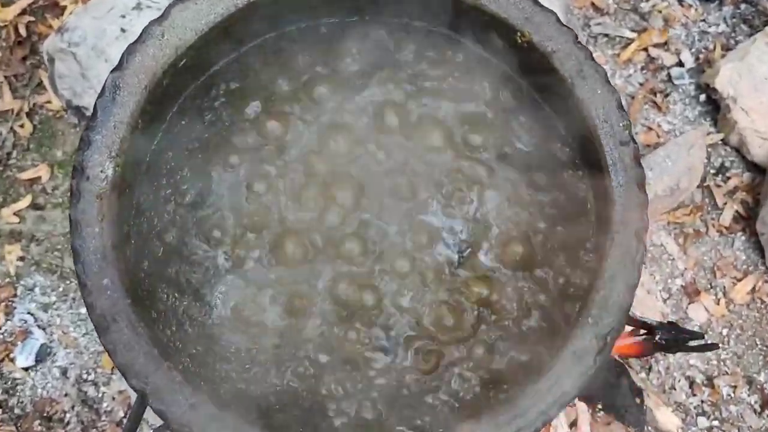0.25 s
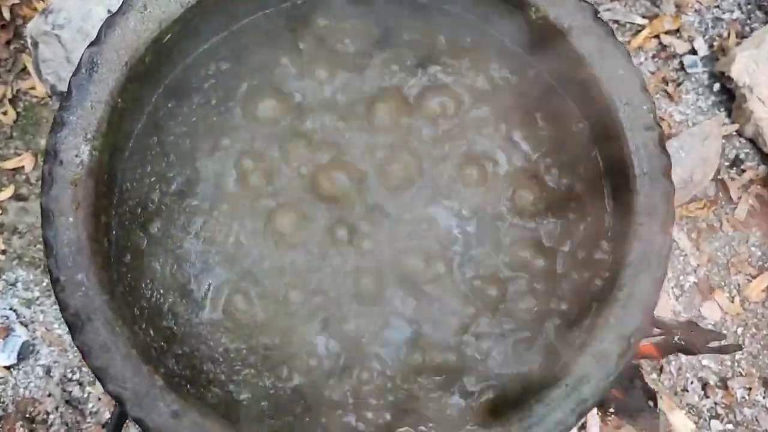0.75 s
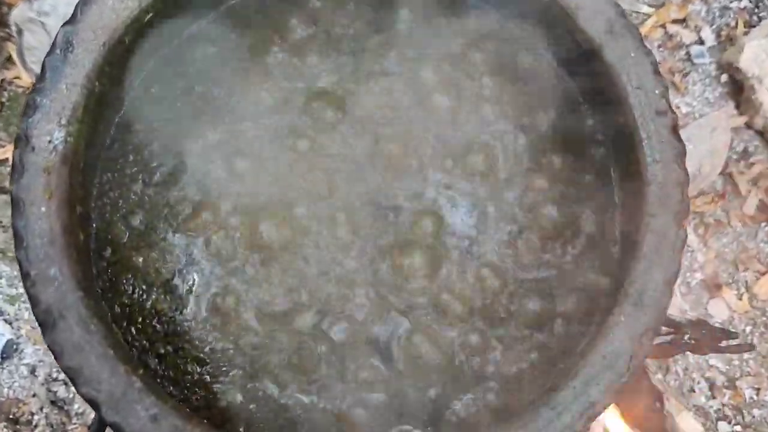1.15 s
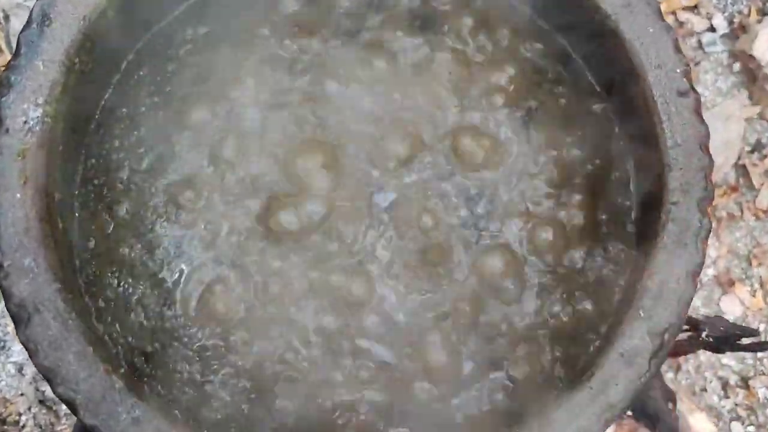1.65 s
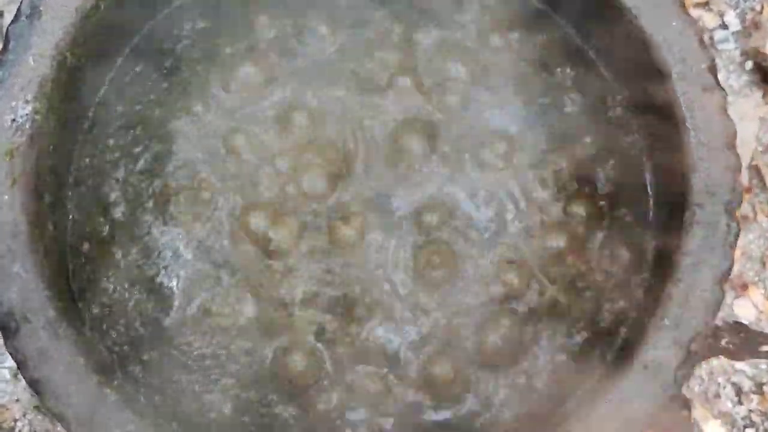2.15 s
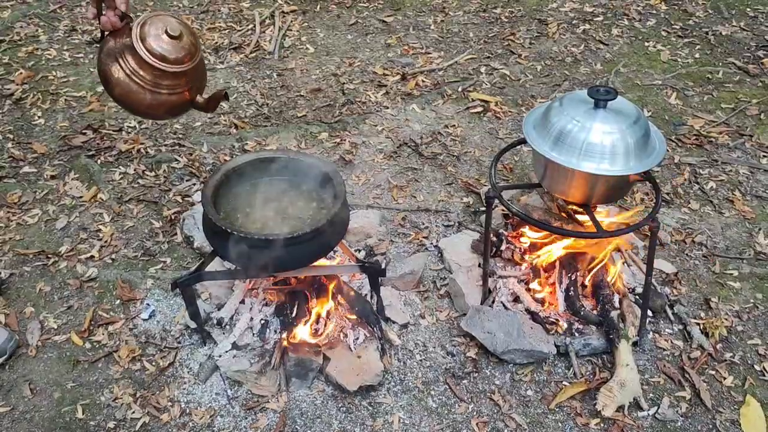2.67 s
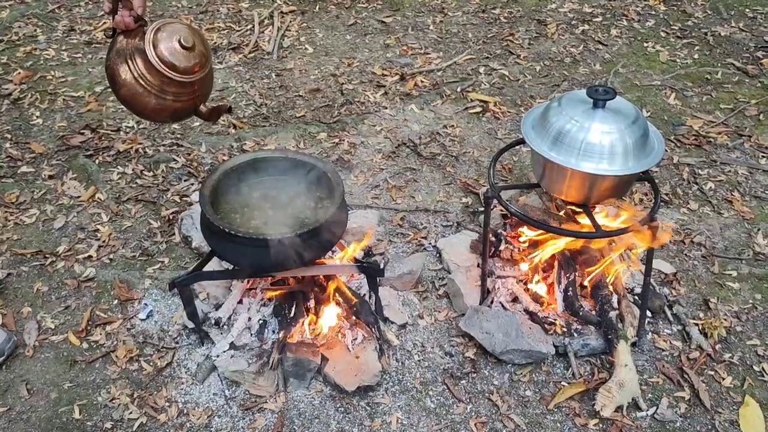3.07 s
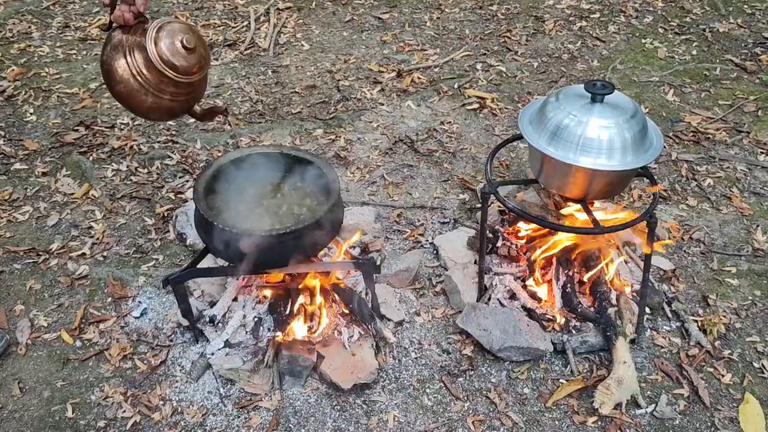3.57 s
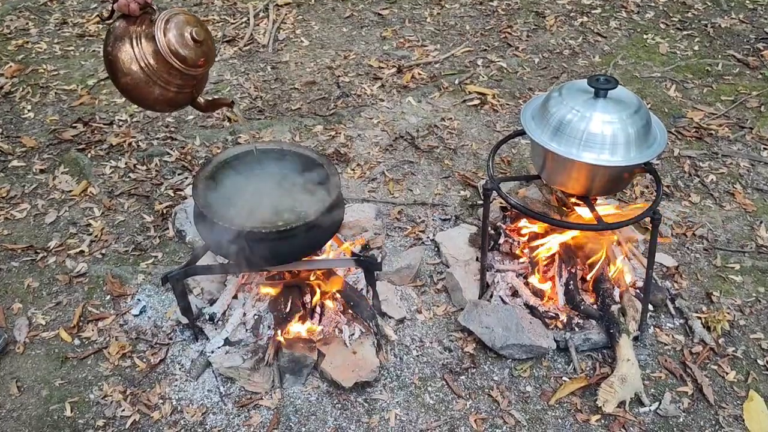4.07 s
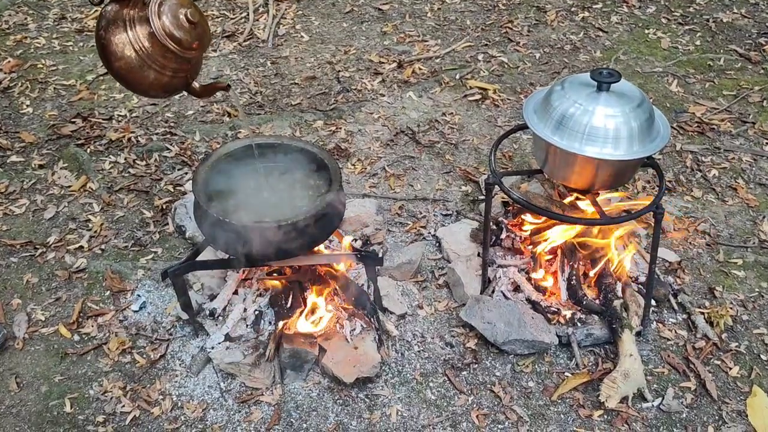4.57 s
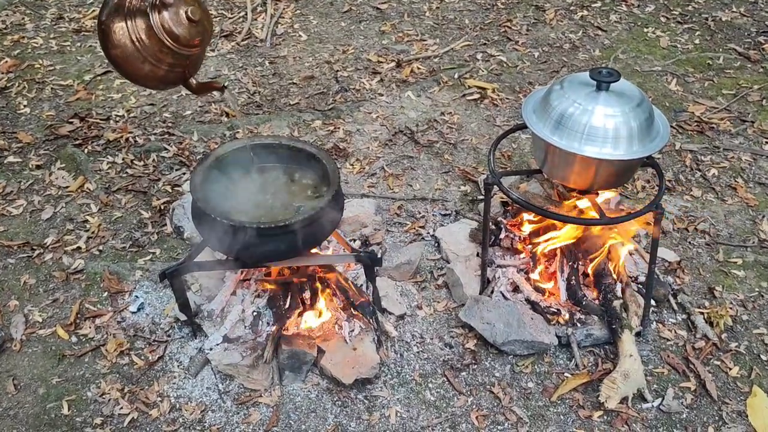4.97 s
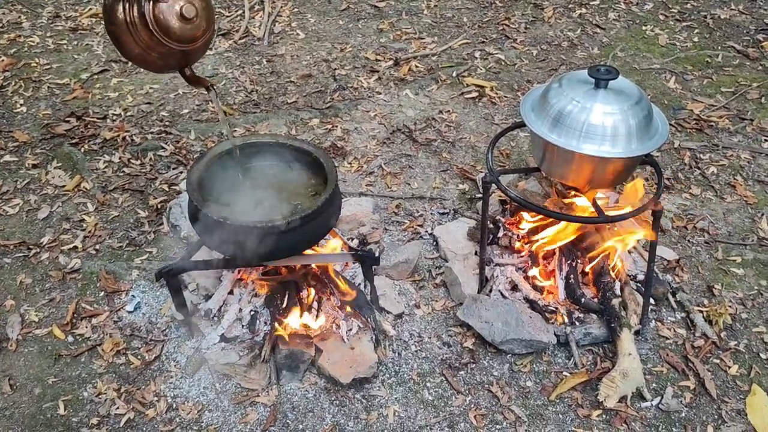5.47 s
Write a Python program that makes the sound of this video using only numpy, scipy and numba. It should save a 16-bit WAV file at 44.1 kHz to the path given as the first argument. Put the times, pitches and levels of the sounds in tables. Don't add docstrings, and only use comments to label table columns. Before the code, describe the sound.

Outdoors, the microphone hangs just above a pot at a rolling boil: dense hollow bubbles, plops, fizzing droplets, steam hiss and low fire rumble with sharp snaps. After about two seconds there is a hard cut and a tiny silence, then a much quieter view from a few steps away, where a kettle's thin stream grows splashier.

```python
import sys
import numpy as np
from scipy import signal
from scipy.io import wavfile
from scipy.ndimage import uniform_filter1d
from numba import njit

SR = 44100
rng = np.random.default_rng(int(sys.argv[2]) if len(sys.argv) > 2 else 0)


def pcm_store(signal):
    levels = np.round(np.clip(np.atleast_2d(signal), -1, 1) * 32767)
    wavfile.write(sys.argv[1], SR, levels.astype(np.int16).T)


def undo_db(level):
    steps = np.asarray(level, float) / 20
    return 10 ** steps


N = 252252
CUT_S, RESTART_S = 2.2405, 2.279


def evened(x):
    return x / np.sqrt(np.mean(x ** 2) + 1e-20)


def colour(x, points):
    freq_hz, db = np.transpose(points)
    hz = abs(np.fft.fftfreq(8192, 1 / SR))
    gain_db = np.interp(np.log(hz + 1), np.log(freq_hz + 1), db, left=-70, right=-70)
    log_gain = np.log(undo_db(gain_db))
    taps = np.fft.ifft(np.exp(np.conj(signal.hilbert(log_gain)))).real[:4096]
    return signal.oaconvolve(x, taps[None], axes=1)[:, :x.shape[1]]


def sides(pan_db):
    return undo_db(np.array([pan_db / 2, -pan_db / 2]))


def noise(same):
    a, b = rng.standard_normal((2, N))
    same = np.clip(same, 0, 1)
    return np.array([a, same * a + np.sqrt(1 - same ** 2) * b])


def drift(seconds, count):
    chance = rng.standard_normal((count, N // 32 + 1))
    return evened(uniform_filter1d(chance, max(2, int(seconds * SR / 32)), axis=1))


@njit
def ring(n, rate, s, hz, t60, glide, rise, gains, lag):
    out = np.zeros((2, n))
    for e in range(len(s)):
        for c in range(2):
            start = int(s[e] * rate + c * lag[e])
            for i in range(max(0, -start), min(int(t60[e] * rate), n - start)):
                u = i / (t60[e] * rate)
                phase = 2 * np.pi * hz[e] * t60[e] * (u + glide[e] * u * u)
                out[c, start + i] += gains[c, e] * min(1., u / rise) * np.exp(-6.9 * u) * np.sin(phase)
    return out


def swarm(count, share, lo_hz, hi_hz, cycles, spread_db, pan_db, lag, glide, clump_db, patch_db, surge_db, rise):
    keep, when, pitch, size, side, length = rng.random((count, 6)).T
    step = (when * N / 32).astype(int)
    clumps = drift(.006, count=1)[0, step]
    surges = drift(0.065, count=1)[0, step]
    patches = drift(.025, count=7)[(pitch * 7).astype(int), step]
    hz = lo_hz * (hi_hz / lo_hz) ** pitch
    rare = -np.log(size + .03)
    size_db = spread_db * rare + clump_db * clumps + patch_db * patches + surge_db * np.minimum(surges, 1.3)
    across = 2 * side - 1
    gains = sides(pan_db * across) * undo_db(size_db) * hz * (keep < share)
    t60 = cycles * (.5 + length) / hz
    return ring(N, SR, when * N / SR, hz, t60, glide * length, rise, gains, lag * across)


# time in seconds, flow from 0 to 1.
FLOW = [
    (2.3, 0.12),
    (2.9, 0.43),
    (3.35, 0.4),
    (3.8, 0.61),
    (4.05, 0.26),
    (4.3, 0.67),
    (4.9, 0.8),
    (5.3, 0.94),
    (5.72, 0.7),
]


def played(x, colours, near_db, far_db, stream_db):
    t = np.arange(N) / SR
    flow = np.interp(t, *np.transpose(FLOW))
    near = evened(colour(x, colours[0])) * undo_db(near_db) * (t < CUT_S)
    far = evened(colour(x, colours[1])) * undo_db(far_db + stream_db * flow) * (t > RESTART_S)
    return near + far


# frequency in Hz, level in dB per Hz.
RUMBLE_NEAR = [(15, -11), (25, -7), (102, 3), (298, -2.5), (450, -1), (580, -26), (990, -120)]
RUMBLE_FAR = [(15, 6), (25, 0), (54, -4.5), (156, -2), (348, -15.5), (400, -18), (520, -24), (880, -120)]


def flames():
    lumps = evened(uniform_filter1d(rng.standard_normal(N), int(0.042 * SR)))
    below = signal.butter(3, 38., fs=SR, output="sos")
    wind = evened(signal.sosfilt(below, noise(0)))
    above = signal.butter(2, 30., "high", fs=SR, output="sos")
    roar = evened(signal.sosfilt(above, noise(0.895)))
    fire = roar * undo_db(1.8 * lumps) + undo_db(-29.0) * wind
    return played(fire, (RUMBLE_NEAR, RUMBLE_FAR), near_db=-53, far_db=-61.5, stream_db=-1)


# frequency in Hz, level in dB per Hz.
POT_NEAR = [(180, -4), (300, -30), (433, -11.5), (619, -1.5), (700, -1), (1040, -12), (1400, -17.5),
            (1550, -19), (2100, -35), (2730, -32), (4620, -120)]
POT_FAR = [(240, -55), (400, -21), (510, -1), (673, -3), (840, -2.5), (1040, -17.5), (1320, -12),
           (1690, -20.5), (1930, -18), (2100, -35), (2730, -32.5), (4620, -120)]


def boil():
    deep = swarm(count=4000, share=.6, lo_hz=292.5, hi_hz=945, cycles=12.5, spread_db=1.6, pan_db=6.5, lag=4.8,
                 glide=0.082, clump_db=2.0, patch_db=2.0, surge_db=0.37, rise=0.093)
    high = swarm(count=2000, share=.55, lo_hz=950, hi_hz=2200, cycles=23.3, spread_db=1.0, pan_db=9.5, lag=17.0,
                 glide=0.12, clump_db=0.5, patch_db=1.0, surge_db=4.0, rise=0.17)
    crowd = evened(deep) + undo_db(2.5) * evened(high)
    churn = undo_db(-0.5) * noise(1.0)
    return played(evened(crowd) + churn, (POT_NEAR, POT_FAR), near_db=-47, far_db=-61.5, stream_db=-0.7)


# frequency in Hz, level in dB per Hz.
FIZZ_NEAR = [(1120, 16.5), (1900, -6), (2120, -12), (3040, -4.5), (3710, -9.5), (6680, -5.5), (7790, -9.5),
             (9420, -8), (11500, -16), (15100, -13.5), (15900, -20.5), (16500, -22)]
FIZZ_FAR = [(1120, 10), (1900, -6.5), (2490, -9), (3240, -6), (4140, -12), (5570, -7), (6620, -11),
            (10300, -11), (12000, -16), (15100, -11.5), (15900, -24), (16500, -17)]


def fizz():
    tiny = swarm(count=40000, share=1., lo_hz=1800, hi_hz=16900, cycles=32., spread_db=1., pan_db=9., lag=14.,
                 glide=0.17, clump_db=2.4, patch_db=2.6, surge_db=1.4, rise=.25)
    drops = swarm(count=2200, share=0.72, lo_hz=2270, hi_hz=6790, cycles=15.7, spread_db=1.0, pan_db=8.0, lag=8.1,
                  glide=0.074, clump_db=0.0, patch_db=-1.0, surge_db=-1.0, rise=0.12)
    steam = noise(0.03)
    tints = (FIZZ_NEAR, FIZZ_FAR)
    out = played(tiny, tints, near_db=-58, far_db=-77.5, stream_db=11.5)
    out += played(drops, tints, near_db=-61.5, far_db=-91, stream_db=20)
    return out + played(steam, tints, near_db=-62, far_db=-77.5, stream_db=7)


# start in
# seconds, peak level in dB, pitch in Hz.
BUBBLES_NEAR = [(0.05, -34, 685), (0.069, -26, 857), (0.459, -38, 645), (0.538, -30.5, 636),
                (0.562, -37, 810), (0.591, -29.5, 790), (0.628, -33, 860), (0.68, -31.5, 620),
                (0.882, -32, 645), (1.009, -34, 580), (1.026, -31, 667), (1.043, -29, 620),
                (1.185, -30, 660), (1.215, -29.5, 650), (1.242, -33, 740), (1.267, -27, 645),
                (1.299, -31, 620), (1.388, -27, 710), (1.437, -30.5, 743), (1.568, -40, 650),
                (1.649, -25.5, 690), (1.763, -32, 634), (1.863, -24, 900), (1.921, -32, 605),
                (1.988, -27.5, 586), (2.012, -30.5, 550), (2.12, -30, 570), (2.207, -31.5, 960)]
BUBBLES_FAR = [(2.34, -46, 816), (2.452, -57, 638), (2.564, -41, 813), (2.762, -44.5, 700),
               (2.881, -48, 594), (2.947, -45, 680), (2.97, -60, 522), (3.02, -44, 750), (3.119, -55, 634),
               (3.144, -62, 716), (3.162, -44, 620), (3.241, -51, 689), (3.344, -51, 721),
               (3.361, -46, 820), (3.388, -57, 608), (3.42, -48.5, 714), (3.512, -51, 600),
               (3.537, -46, 640), (3.598, -43.5, 646), (3.686, -55, 536), (3.734, -43, 617),
               (3.75, -41.5, 770), (3.826, -46, 520), (3.895, -47, 680), (3.971, -44, 579),
               (4.079, -47.5, 638), (4.203, -50, 780), (4.295, -45, 636), (4.434, -45.5, 650),
               (4.483, -40, 670), (4.531, -46, 650), (4.56, -57, 694), (4.58, -48, 640),
               (4.643, -43.5, 600), (4.692, -43, 830), (4.744, -46, 673), (4.761, -41.5, 581),
               (4.837, -61, 496), (4.867, -46.5, 700), (4.892, -42.5, 634), (4.953, -42.5, 598),
               (5.027, -49, 720), (5.057, -45, 690), (5.105, -56, 700), (5.187, -49, 526),
               (5.206, -40, 687), (5.263, -45, 590), (5.291, -51, 870), (5.335, -52, 690),
               (5.365, -61, 710), (5.386, -53, 638), (5.434, -47, 630), (5.48, -45.5, 668),
               (5.514, -42.5, 650), (5.543, -45, 600), (5.586, -48, 710), (5.654, -43, 711),
               (5.684, -46, 795)]
MORE_BUBBLES_NEAR = [(0.194, -53, 604), (0.311, -41, 750), (0.342, -55, 755), (0.368, -41, 700),
                     (0.429, -46, 660), (0.483, -37, 474), (0.504, -45, 690), (0.74, -34, 740),
                     (0.811, -38, 840), (0.902, -34, 520), (0.958, -37, 646), (1.099, -42, 705),
                     (1.142, -34, 640), (1.159, -27, 695), (1.462, -33.5, 665), (1.521, -36.5, 665),
                     (1.579, -32, 700), (1.661, -33, 708), (1.693, -30.5, 740), (1.733, -41, 650),
                     (1.79, -37, 781), (1.813, -42, 623), (1.842, -29, 730), (1.902, -44, 610),
                     (1.933, -42, 662), (1.952, -40, 608), (2.037, -36, 681), (2.081, -33, 587),
                     (2.184, -36, 593), (2.224, -32.5, 682)]
# start in seconds, peak level in dB, pitch in Hz, left-right difference in dB.
PLOPS_NEAR = [(0.0472, -31, 856, 3), (0.196, -47, 1080, 5), (0.2089, -30, 1040, 3),
              (0.2853, -42, 1370, -4.5), (0.3757, -29, 1170, 5.5), (0.4593, -26.5, 950, -3.5),
              (0.52, -36, 1340, -2.5), (0.688, -28.5, 1310, 3), (0.6993, -27, 1220, 2.5),
              (0.8375, -38, 1070, 2), (0.8826, -32, 1090, 7), (1.1912, -35.5, 1130, -2),
              (1.2156, -46, 1310, 19), (1.26, -37, 1350, -5), (1.3815, -32.5, 980, 3),
              (1.4288, -37, 1050, 6), (1.491, -38, 1120, 2), (1.5247, -31.5, 1100, 10.5),
              (1.5683, -34.5, 1360, -5), (1.8064, -37, 1260, -6.5), (1.8597, -40, 950, -2),
              (1.923, -44, 1500, 2.5), (2.0395, -42, 1060, 19), (2.131, -44, 1040, 24),
              (2.1848, -41, 800, 4), (2.2085, -27.5, 1383, 4.5), (0.2947, -39, 1350, -6),
              (0.3571, -54, 1110, 11), (0.4838, -39, 1120, 3), (0.6145, -47, 1130, 4),
              (0.6285, -39, 1160, -6), (0.8614, -38, 1250, -2), (1.1194, -39, 1150, 6),
              (1.8213, -39, 1330, 2), (1.9525, -46, 1570, 0.5), (1.9644, -37, 1250, 7.5),
              (2.0547, -37, 1160, 8)]
# start in seconds, peak level in dB, pitch in Hz.
PLOPS_FAR = [(2.4823, -50, 1230), (2.681, -47, 1240), (2.696, -52, 1240), (2.7303, -50, 1250),
             (2.899, -51.5, 1260), (2.9474, -49, 1250), (2.987, -45, 1310), (3.0504, -49, 1250),
             (3.074, -47.5, 1310), (3.163, -45.5, 1280), (3.2, -45.5, 1210), (3.3606, -50.5, 1140),
             (3.411, -51, 1270), (3.533, -47, 950), (3.5811, -47, 960), (3.625, -52, 1300),
             (3.756, -47, 1200), (3.92, -48.5, 1190), (4.1082, -50, 1300), (4.2906, -55, 1540),
             (4.435, -46, 1390), (4.487, -43, 1336), (4.693, -47, 1190), (4.7057, -43, 1250),
             (4.8914, -48.5, 1240), (4.954, -45, 1260), (5.166, -51, 1190), (5.334, -48, 1230),
             (5.408, -45, 1280), (5.482, -48.5, 1310), (2.651, -48, 990), (3.1, -60, 1200),
             (3.425, -51, 1250), (3.774, -48.5, 1250), (4.02, -56, 1270), (4.221, -53.5, 1250)]
CHIRPS = [(0.2109, -44, 1520), (0.2843, -44, 1600), (0.629, -50, 1750), (1.5349, -37, 1630),
          (1.8736, -34.5, 1410), (2.6808, -50.5, 1600), (2.9392, -65, 2100), (3.0565, -49.5, 1700),
          (3.1622, -55, 1450), (3.4096, -53, 1610), (3.172, -51, 1800), (3.79, -53, 1530),
          (4.083, -59.5, 1480), (4.113, -58, 1630)]


def bubbles():
    deep = []
    for rows, t60 in ((BUBBLES_NEAR, 0.023), (BUBBLES_FAR, 0.027), (MORE_BUBBLES_NEAR, 0.022)):
        deep += [(*row, t60, 1.2) for row in rows]
    plops = PLOPS_NEAR + [(*row, 3) for row in PLOPS_FAR]
    wall = [(s, db, hz, 0.017 * (hz / 1250) ** 2.56, pan_db) for s, db, hz, pan_db in plops]
    quick = [(*row, .016, 2.5) for row in CHIRPS]
    out = np.zeros((2, N))
    for rows, rise, glide, boost_db in ((deep, 0.11, 0.058, 2.5), (wall + quick, 0.16, 0.19, 6.5)):
        s, db, hz, t60, pan_db = np.transpose(rows)
        t60 = np.clip(t60, .004, .08)
        still = 0 * s
        lag = -1.5 * pan_db * (hz > 950)
        gains = sides(pan_db) * undo_db(db + boost_db)
        body_hz = (1.03 - 0.42 * glide) * hz
        out += ring(N, SR, s - .0008, body_hz, t60, glide + still, rise, gains, lag)
        heave = ring(N, SR, s - .0008, 0.47 * hz, 0.46 * t60, still, 0.14, gains, 0 * lag)
        film = ring(N, SR, s - .0004, 1.21 * hz, 0.53 * t60, .5 + still, 0.019, gains, lag)
        out += undo_db(-9.5) * heave + undo_db(-17.0) * film
    return out


def splash(shared, own, hz, spray_db, length, tint):
    u = np.arange(len(shared)) / SR / max(length, .002)
    burst = (shared + 1.9 * own) * u ** 2 * np.exp(-13. * u)
    ringing = signal.butter(2, (hz * 0.93, hz * 1.094), "band", fs=SR, output="sos")
    band = signal.sosfilt(ringing, burst)
    wide = colour(signal.lfilter([1, -.5], 1, burst), tint)
    span = 1.8
    around = signal.butter(2, (hz / span, min(hz * span, .45 * SR)), "band", fs=SR, output="sos")
    spray = signal.sosfilt(around, wide) + undo_db(-15) * wide
    out = 0
    for gain, part in ((1, band), (undo_db(spray_db), spray)):
        level = part / part.std(axis=1)[:, None]
        out = out + gain * level / abs(level).max()
    return out


# start in seconds,
# peak level in dB, ringing frequency in Hz, wide spray in dB, left-right difference in dB.
SNAPS_NEAR = [(0.2384, -36.5, 6460, 11.5, 0), (0.2386, -30, 11900, -8, 6), (0.3434, -45, 5320, 8, -8),
              (0.5257, -36.5, 2880, 1, 2), (0.6305, -47, 2540, 0, -2), (0.6619, -41, 7030, -15, 8),
              (1.2141, -51.5, 6100, 15.5, 1), (1.3264, -39.5, 4100, -11, 0), (1.4232, -39.5, 2590, 3, 1),
              (1.4701, -43, 5230, 5, 0), (1.5412, -42.5, 4800, 15.5, 1), (1.5548, -29.5, 9200, 9.5, 0.5),
              (1.5676, -34.5, 8650, 8.5, -2), (1.5774, -53, 5500, 16, 6), (1.6182, -46, 5900, -9, 2),
              (1.7814, -39.5, 6170, -21, 2), (1.8213, -31, 2780, -28, -6), (1.8647, -38, 2400, 1, -2),
              (1.9535, -27.5, 3560, -2.5, -4.5), (2.1106, -39, 5240, -20, -3), (2.1864, -43, 6720, -4, 2),
              (2.2278, -41, 3500, 4.5, -5), (0.2967, -46, 6650, -11, 3), (0.4768, -44, 5490, -9, 0),
              (0.7696, -44, 3870, -9, 0), (1.0121, -39.5, 5040, -6, -2), (1.0595, -45, 6060, -6, 0),
              (1.1777, -47, 3140, -9, -1), (1.5264, -42, 8950, -3, -7), (1.599, -43, 3300, -15, -2),
              (1.6886, -47.5, 3290, -15, -8), (1.7355, -42, 6510, -4, 3), (1.9195, -41, 6560, -6, 4),
              (2.0537, -45, 2680, -1, -2), (2.1964, -38, 6500, -9, 4)]
SNAPS_FAR = [(2.9382, -59, 2200, 12.5, -1), (3.6445, -61, 7140, 11, 2), (4.465, -42, 3830, 1, -1),
             (4.4825, -54, 8000, 8.5, -5), (4.6224, -52.5, 5080, -3, -4), (4.9533, -48.5, 2340, -3, 0),
             (5.303, -46, 13400, -1.5, 7), (5.335, -52.5, 6800, 2, 2), (2.6001, -67, 6040, 5, 11),
             (2.7812, -51, 14100, 0, -2), (2.8855, -55, 3900, -11, -4), (3.4233, -62, 9800, 0, 2),
             (4.0124, -53, 3020, -2, 5), (4.1017, -60, 2240, 6, 4), (4.2748, -56, 3200, -9, -2),
             (4.2925, -54, 12500, 10, 0), (4.3, -46.5, 3200, -9, 0), (4.401, -59, 13100, 5, 0),
             (4.436, -62, 13000, -5, 0), (4.5165, -61, 12000, 3, 0), (4.7907, -51, 3220, -7, -1),
             (4.855, -61, 8000, 5, 0), (4.9, -59, 12100, 3, 1), (4.9229, -58, 8780, -3, -2),
             (5.1234, -62, 3200, -13, -2), (5.2626, -39.5, 9400, -0.5, -4), (5.263, -41, 13400, -8, 8),
             (5.2835, -54, 3100, 5, -5), (5.3225, -54, 8900, -4, -7), (5.354, -65, 10000, 5, -2),
             (5.585, -51, 13200, 8, 0)]
# start in seconds, peak level in dB, wide spray in dB.
STRIKES_LOW = [(3.438, -52, 0.5), (3.49, -51, -10), (3.543, -53, 4), (3.6245, -48, 1.5), (3.882, -54, -10),
               (4.2902, -46, 3.5), (4.3204, -48.5, -11), (4.347, -48, -3), (4.5138, -40, -3.5),
               (4.692, -46, -10), (4.7316, -51, -11), (4.755, -46.5, -5), (4.862, -45, -3),
               (4.9844, -48, 3.5), (5.021, -42, -21), (5.104, -54, 0), (5.141, -52, 5), (5.5832, -38, -1)]
STRIKES_MID = [(3.364, -63, 17), (3.437, -48.5, -16), (3.491, -45.5, -15), (3.819, -49, -4),
               (4.379, -45.5, -8), (5.3847, -38, 2.5), (5.461, -55, 12), (5.477, -49, 2),
               (5.534, -51.5, -3), (5.544, -55.5, 7), (5.653, -51, -8)]
STRIKES_HIGH = [(3.689, -44, -0.5), (3.789, -62, 9), (4.6937, -42.5, -9), (4.761, -54.5, 9), (4.77, -55, 6),
                (4.804, -52.5, 8.5), (4.8378, -59, -7), (4.891, -40, 4.5), (4.9352, -53, -1),
                (5.15, -54, 4), (5.1943, -49, -5), (5.514, -49, 3)]


def snaps():
    far = list(SNAPS_FAR)
    for rows, hz, pan_db in ((STRIKES_LOW, 3305, -1), (STRIKES_MID, 5780, 0), (STRIKES_HIGH, 8740, -4)):
        far += [(s, db, hz, spray_db, pan_db) for s, db, spray_db in rows]
    # events, colour, tail dB, falling drop dB, length s
    places = ((SNAPS_NEAR, FIZZ_NEAR[1:], -22, -28, 0.0043), (far, FIZZ_FAR[1:], -16, -22, 0.012))
    out = np.zeros((2, N + 4096))
    for rows, tint, tail_db, back_db, length in places:
        chance = rng.standard_normal((len(rows), 3, 3, 1800))
        for (s, db, hz, spray_db, pan_db), draws in zip(rows, chance):
            back_s = .011 + .002 * draws[2, 0, 0]
            parts = ((0, 0, 1), (.001, tail_db, 3.), (back_s, back_db, 1.5))
            for (late, late_db, stretch), z in zip(parts, draws):
                drop = splash(z[0], z[1:], hz, spray_db, stretch * length, tint)
                at = round((s + late - .0003) * SR)
                out[:, at:at + drop.shape[1]] += undo_db(db - 1.5 + late_db) * sides(pan_db)[:, None] * drop
    return out[:, :N]


def scene():
    since = np.arange(N) / SR - RESTART_S
    fade = np.where(since < 0, 1, np.clip(0.07 + since / 0.23, 0, 1))
    edge = signal.firwin(1023, 15960, window=("kaiser", 6), fs=SR)
    bed = signal.oaconvolve(flames() + boil() + fizz(), edge[None], "same")
    return bed * fade + bubbles() + snaps()


# start in seconds, length in seconds, lowest frequency in Hz, depth in dB.
TREBLE_GAPS = [(1.5365, .003, 8000, -20), (1.546, .005, 8000, -25), (4.277, .008, 10000, -20),
               (4.369, .006, 3500, -10), (4.475, .005, 7000, -12), (4.673, .008, 11000, -15),
               (4.787, .009, 4000, -14), (4.884, .006, 4500, -15), (5.183, .005, 4000, -9),
               (5.2515, .004, 4000, -12), (5.372, .008, 3200, -35), (5.521, .006, 5000, -11)]


def treble_gaps(x):
    out = x.copy()
    for s, length, from_hz, depth_db in TREBLE_GAPS:
        a, n = round(s * SR), round(length * SR)
        treble = signal.butter(6, from_hz, "high", fs=SR, output="sos")
        high = signal.sosfiltfilt(treble, x[:, a - 400:a + n + 400])
        out[:, a:a + n] -= (1 - undo_db(depth_db)) * signal.windows.tukey(n, .25) * high[:, 400:-400]
    return out


def roll_off(x):
    return signal.sosfilt(signal.butter(12, 16810, fs=SR, output="sos"), x)


def record(dry):
    t = np.arange(N) / SR
    edge = signal.firwin(255, 16500, window=("kaiser", 7), fs=SR)
    dry = signal.oaconvolve(dry, edge[None], "same")
    wet = treble_gaps(dry) * ((t < CUT_S) | (t > RESTART_S))
    cut, tail = round(CUT_S * SR), round(0.0048 * SR)
    smear = np.zeros((2, N))
    smear[:, cut:cut + tail] = undo_db(-29) * dry[:, cut - tail:cut] * np.linspace(1, 0, tail)
    since = np.maximum(t - RESTART_S, 0)
    rise_s, fall_s = 0.18, 0.22
    settle = (1 - 0.94 * np.exp(-since / rise_s)) * np.exp(-since / fall_s) * (since > 0)
    offset = np.outer((-0.0089, -0.0012), settle)
    return roll_off(wet + smear + offset)


dry = scene()
out = record(dry)
pcm_store(out)
```